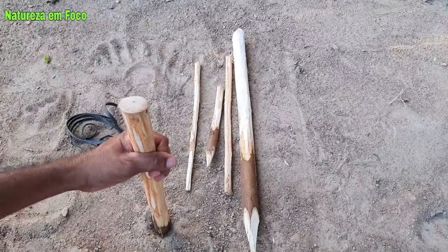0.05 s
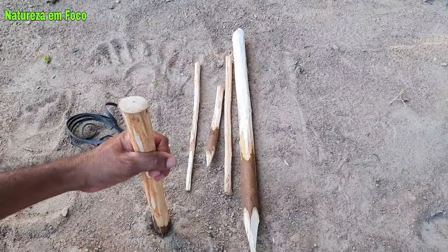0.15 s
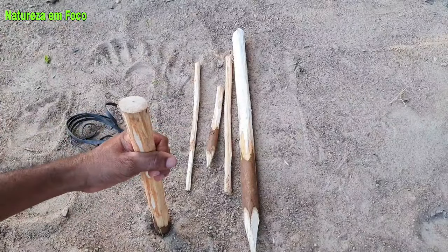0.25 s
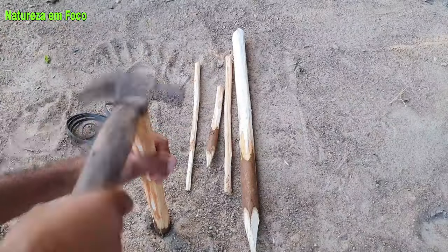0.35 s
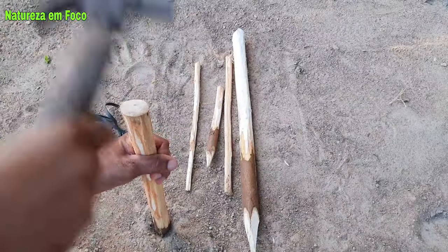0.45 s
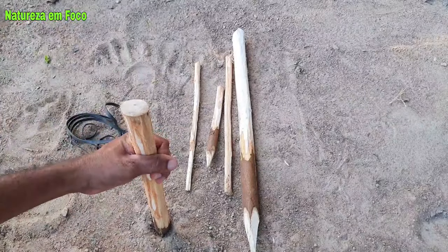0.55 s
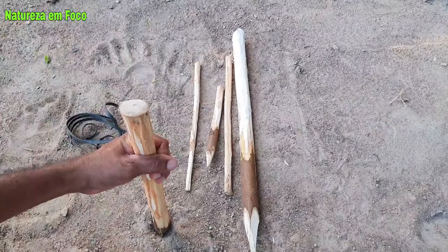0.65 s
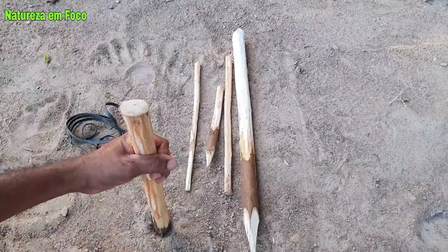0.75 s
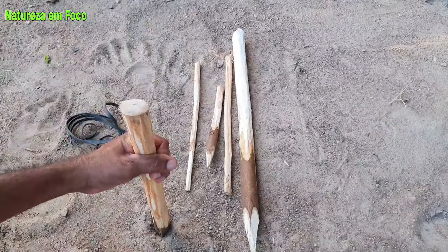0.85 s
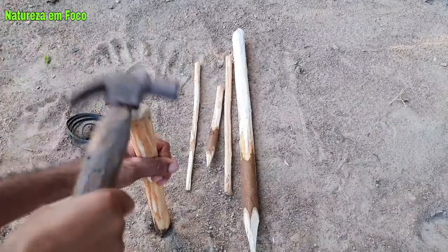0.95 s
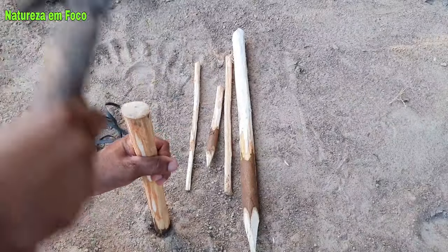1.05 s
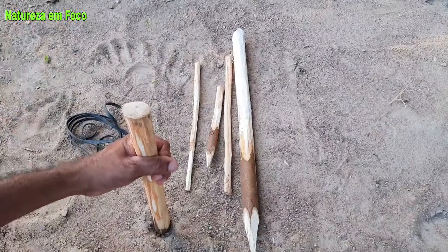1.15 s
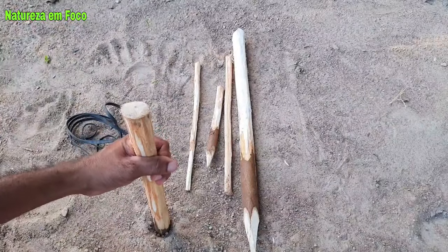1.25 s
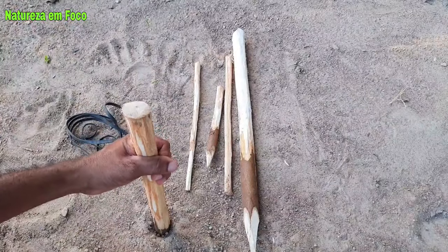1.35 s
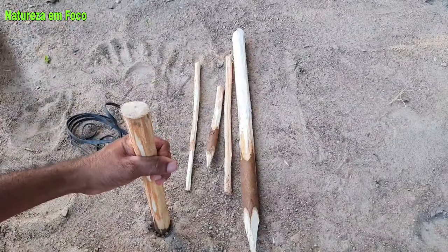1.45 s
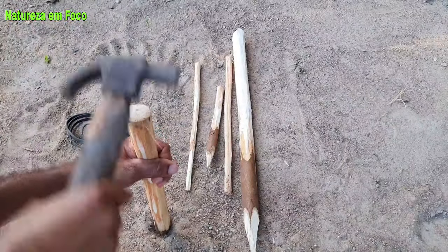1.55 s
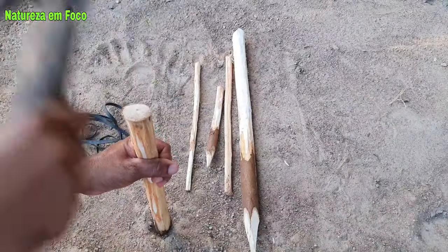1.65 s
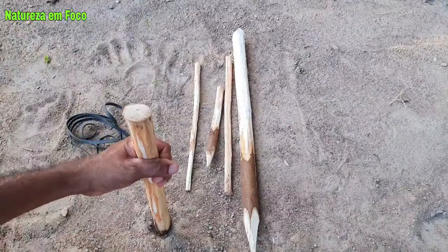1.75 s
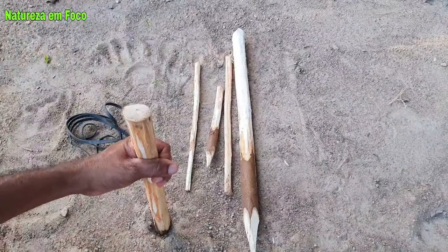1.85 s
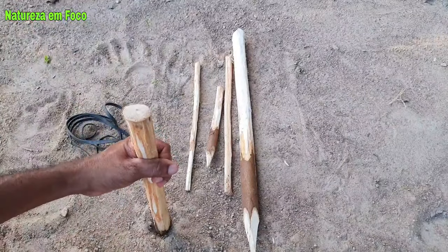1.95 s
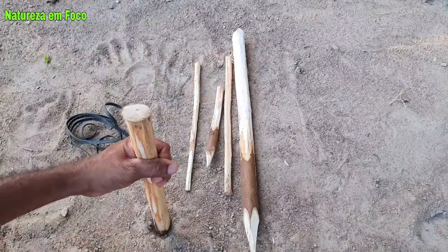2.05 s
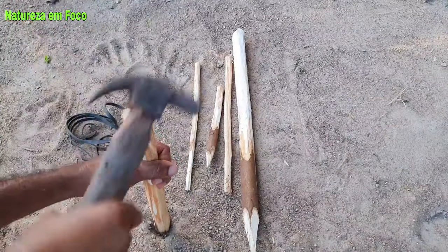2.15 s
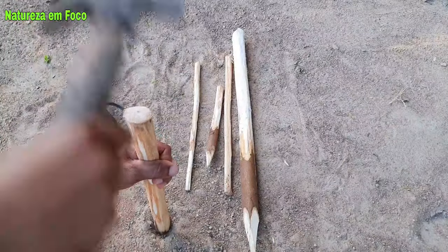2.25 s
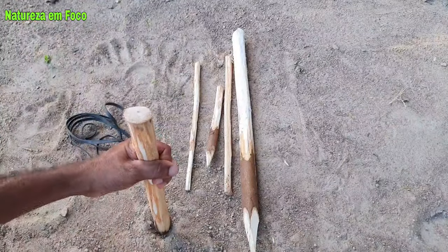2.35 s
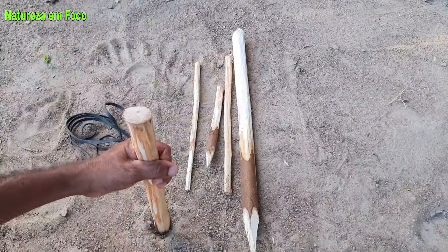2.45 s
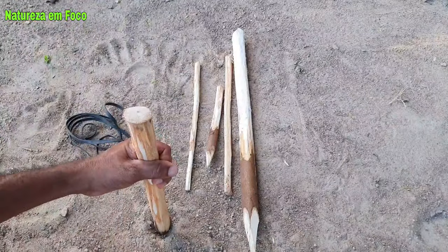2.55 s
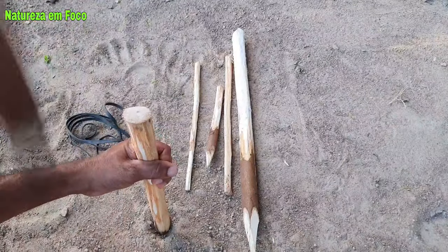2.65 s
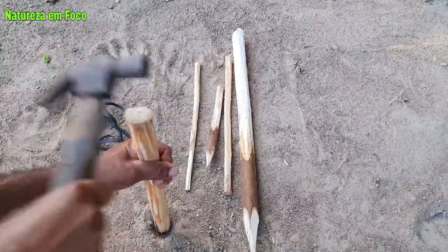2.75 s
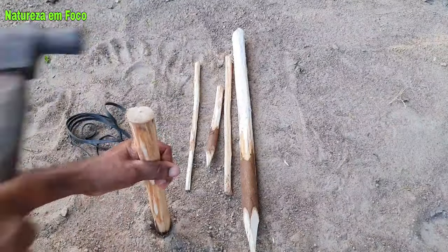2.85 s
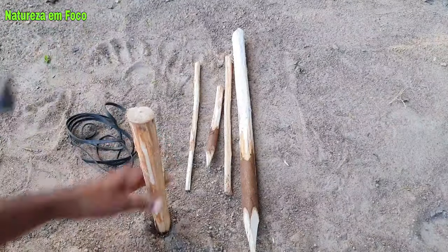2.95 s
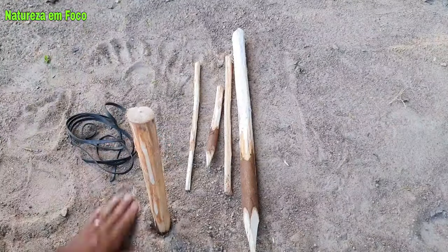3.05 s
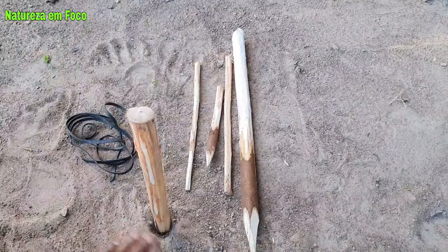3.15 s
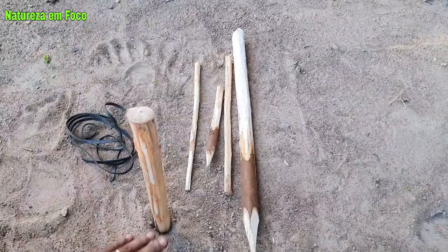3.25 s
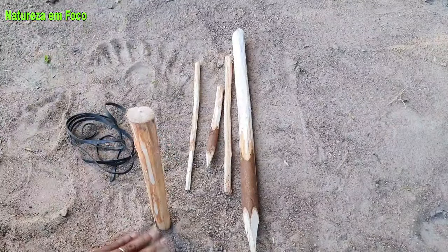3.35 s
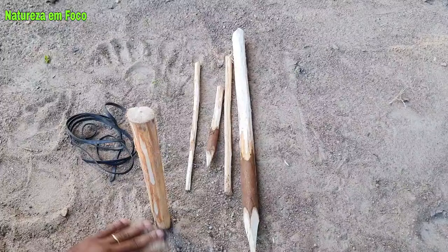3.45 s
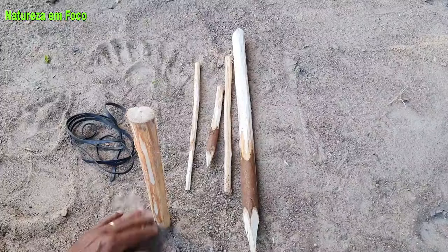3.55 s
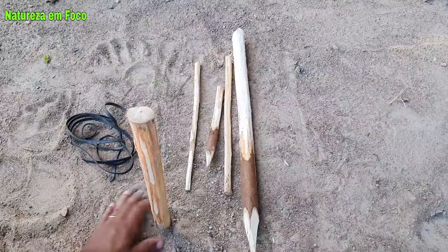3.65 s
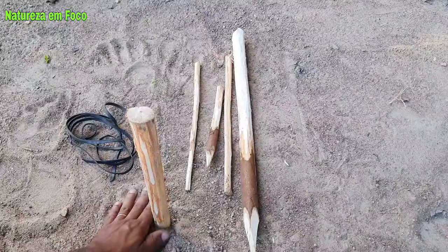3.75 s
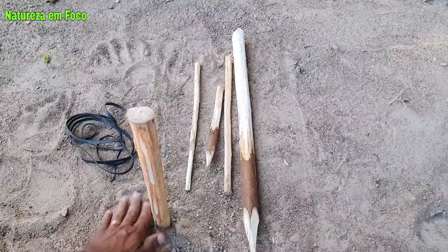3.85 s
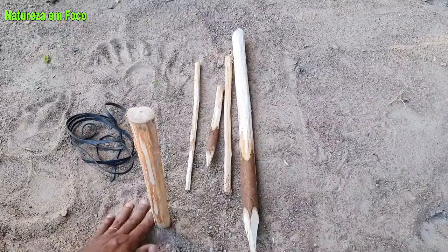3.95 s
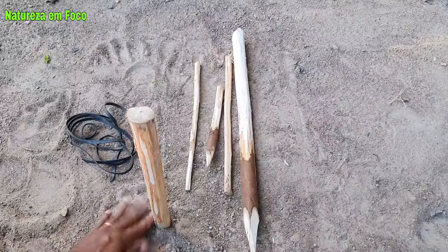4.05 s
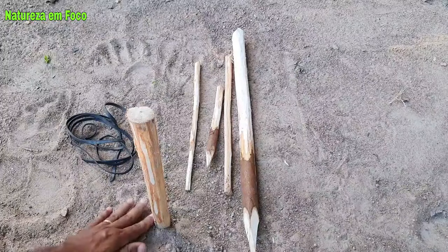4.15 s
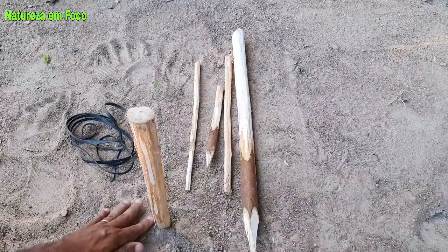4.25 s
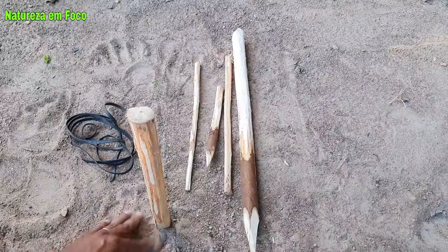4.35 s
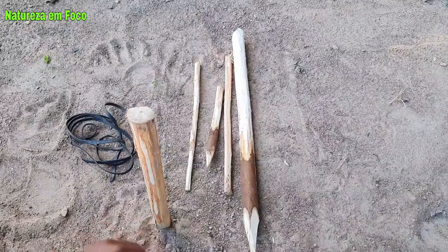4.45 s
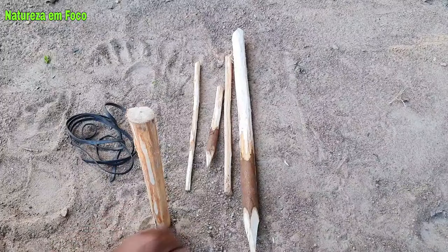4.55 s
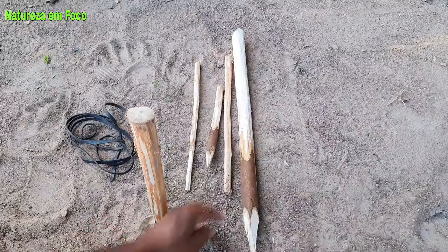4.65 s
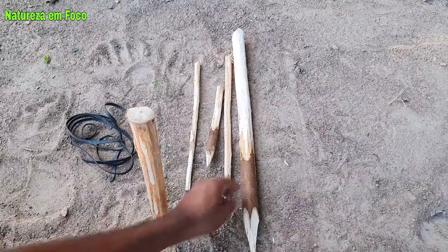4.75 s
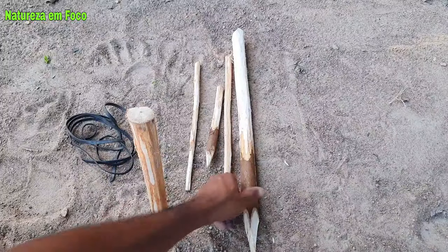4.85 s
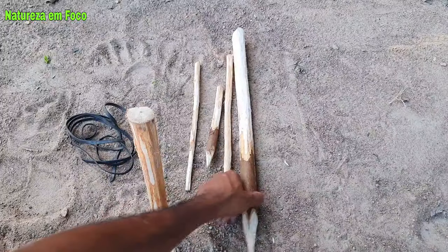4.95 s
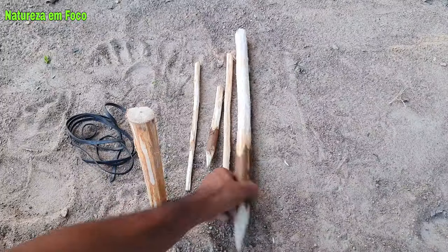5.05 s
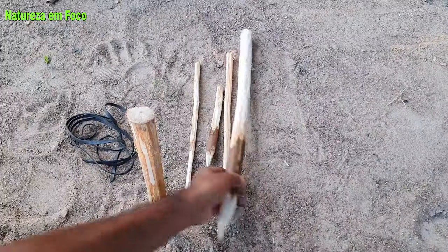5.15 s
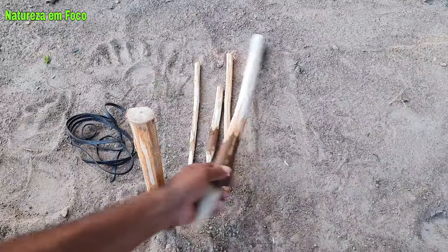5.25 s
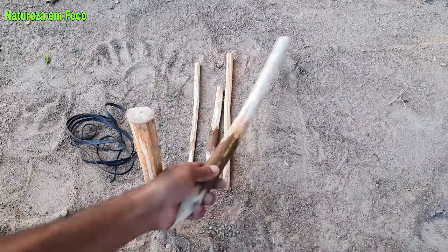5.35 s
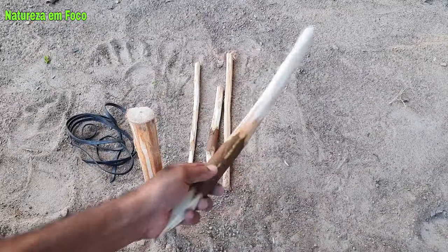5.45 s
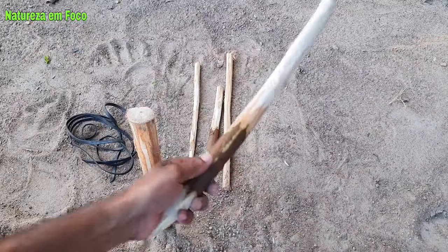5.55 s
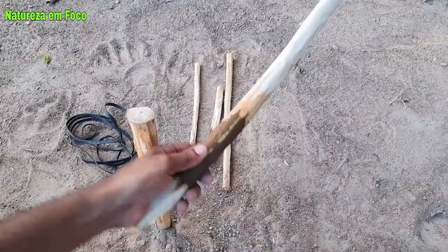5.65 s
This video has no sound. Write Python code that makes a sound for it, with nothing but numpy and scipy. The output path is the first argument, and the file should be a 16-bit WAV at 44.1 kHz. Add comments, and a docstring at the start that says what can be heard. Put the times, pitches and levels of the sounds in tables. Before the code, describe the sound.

Outdoors on sandy ground, a steel hammer drives a hand-held wooden stake. The tail of a blow opens the sound, then loud blows fall at about 0.5, 1.1, 1.65, 2.3 and 2.85 seconds. Each is a short, dry, mid-pitched wooden knock with a crisp crack, a slight low soil thud and barely any steel ring, trailed by a brief diffuse echo. At 3.2 the hammer is laid down with a soft thump and crunch. From 3.5 to 4.8 a hand quietly presses and smooths the sand; from about 4.8 to the end another stake scrapes and lifts, with grains running and small woody ticks, clearest near 5.4. Very quiet behind: high insect shrilling with a regular phrase, distant falling whistles mostly before 2.2, hoarse bird chips near 2 and 4, air rumble, and a far engine hum slowing after 3.3. Close stereo microphones, blows slightly left.

```python
"""A steel hammer drives a hand-held wooden stake into sandy ground with steady blows, outdoors.
Each blow sums damped modes of wood and steel, a noisy crack and a soil thud of falling pitch; noise forms its echoes.
Then the hammer is laid down, a hand smooths the sand and lifts another stake: clumped impulses and shaped noise.
Insects drone in narrow bands of noise, birds call in gliding tones blurred by distance,
and a far engine hums on two harmonics over the low rumble of open air."""
import sys
import numpy as np
from scipy import signal
from scipy.fft import rfft, irfft
from scipy.io import wavfile
from scipy.ndimage import map_coordinates

SR = 44100
rng = np.random.default_rng(int(sys.argv[2]) if len(sys.argv) > 2 else 0)


def put_to_file(sound):
    """Save the sound as 16-bit audio at rate SR, in the file named by the first command-line argument."""
    columns = np.atleast_2d(sound).T  # one column per channel
    safe = np.clip(columns, -1, 1)
    whole_steps = np.round(safe * 32767)
    wavfile.write(sys.argv[1], SR, whole_steps.astype(np.int16))


N = 250929
T = np.arange(N) / SR   # time in s

# All spectra below give relative levels.
# hammer blows: start_s, knock_rel_db, knock_pitch_ratio, crack_rel_db, soil_thud_db, steel_rel_db,
# echo_rel_db, echo_length_ratio
BLOWS = [(-0.09, -1, 1, 3, -13, -40.5, -1.5, .9), (0.5010, -0.5, 0.98, 2, -21, -46, 0.5, 0.88),
         (1.0915, 0, .99, -3, -18.5, -45.5, -4, 0.91), (1.6599, 0.5, .99, 0.5, -18.5, -42.5, -2, 0.96),
         (2.2783, 0, 1.025, 3.5, -16.5, -48, 2, 0.84), (2.862, -.5, 0.97, 0.5, -15, -38.5, -2, 0.73)]
# modes of the stake, damped by hand and soil: frequency_hz, level_rel_db, t60_s
STAKE_MODES = [(464, -32.5, 0.039), (695.4, -25.5, 0.046), (1220, -21.5, 0.021), (1450, -15, 0.011),
               (1610, -27.5, 0.0074), (2298, -18, 0.016), (2580, -20.5, .018), (3530, -23.5, .007),
               (4150, -23, 0.0051)]
KNOCK_HZ, KNOCK_PEAK_S, KNOCK_DB = 941, 0.0015, -3   # main mode; each blow shifts its pitch and level
# modes of the hammer head: frequency_hz, level_rel_db, t60_s
STEEL_MODES = [(2686, -9.5, 0.18), (5310, 2.5, 0.17), (5370, -9, 0.073), (5460, -6, 0.19),
               (7580, -9.5, 0.11)]
# crushing of wood fibres at the contact: frequency_hz, level_db_per_hz
CRACK_SPECTRUM = [(400, -1), (1400, -1.5), (2600, 0.5), (4200, -0.5), (5500, -15), (7000, -15), (9500, -20),
                  (15000, -24)]
# scatter from trees and ground: frequency_hz, level_db_per_hz
SCATTER_SPECTRUM = [(100, 3.5), (300, 1), (450, -7.5), (580, -11.5), (740, -0.5), (1000, 3), (1500, -12),
                    (1900, -7), (2500, -3), (3300, -13.5), (4700, -17.5), (7000, -18), (9000, -21.5),
                    (14000, -24)]
# decay of that scatter, before each blow's length ratio: frequency_hz, t60_s
SCATTER_T60 = [(150, 0.36), (500, 0.37), (1400, 0.32), (3700, 0.55), (10000, 0.43)]

# rumble of open air: frequency_hz, level_db_per_hz
AIR_SPECTRUM = [(25, -24.5), (50, -5.5), (75, 3.5), (120, -3), (190, -8.5), (260, -18), (400, -25.5),
                (650, -30), (950, -27.5), (1300, -32), (2200, -30.5), (4300, -33.5), (9000, -47.5),
                (15000, -40.5)]
# left-right likeness of diffuse sound: frequency_hz, likeness_0_to_1
LIKENESS = [(60, 0.88), (130, 0.8), (290, 0.79), (640, 0.1), (1400, 0.61), (4000, 0.36), (6800, 0.9),
            (9000, .15)]
# the far engine holds its speed, then slows: time_s, mean_firing_hz
ENGINE_SPEED = [(0, 79.24), (1.1, 80.13), (3.25, 79.34), (4.45, 75.07), (5.69, 72.42)]
# hum of the engine as it slows: time_s, fundamental_rel_db, second_harmonic_rel_db
ENGINE_LEVEL = [(3.0, -56, -58), (3.51, -62.5, -60), (3.65, -49, -93), (3.72, -48.5, -64),
                (4.42, -63.5, -51.5), (4.52, -42.5, -48), (4.57, -52, -79), (4.64, -61, -54),
                (4.87, -62, -74), (5.12, -54.5, -52.5), (5.16, -54.5, -65.5), (5.69, -53, -51.5)]
# hum before it slows: fundamental_rel_db, second_harmonic_rel_db
ENGINE_STEADY = (-64, -64.5)

# insect chorus: frequency_hz, level_db_per_hz
CHORUS_SPECTRUM = [(4600, -32), (5200, -9.5), (5600, -6), (6100, -3.5), (6550, -2.5), (6900, -0.5),
                   (7200, -6), (7600, -15), (8500, -29)]
CHORUS_DB = -63
# rising notes of the insect's phrase: delay_s, length_s, start_hz, end_hz
PHRASE_NOTES = [(0, .39, 5420, 5496), (.165, .37, 5040, 5202)]
PHRASE_FIRST_S, PHRASE_PERIOD_S, PHRASE_DB = 0.0042, 0.818, -63.5

# a bird's whistles, sliding down to one low note: start_s, length_s, start_hz, level_db
WHISTLES = [(0.235, .15, 3010, -68.5), (0.629, 0.16, 1978, -65), (1.229, 0.087, 1852, -72),
            (1.459, 0.11, 2230, -69), (1.76, .2, 2336, -63), (2.034, 0.046, 2072, -66.5)]
WHISTLE_END_HZ = 1590
# short, hoarse chips of another bird: start_s, start_hz, level_db
CHIPS = [(1.762, 3560, -73), (1.839, 3450, -70.5), (2.178, 3410, -70), (3.508, 4330, -70.5),
         (3.96, 3280, -70.5), (4.06, 3800, -67), (4.079, 2660, -71), (4.12, 4450, -71)]
CHIP_S, CHIP_FALL = 0.07, 0.92   # length; end pitch over start pitch
# far, level notes: start_s, length_s, pitch_hz, level_db
HELD_NOTES = [(2.075, .66, 1683, -73), (4.719, 0.143, 982, -72)]

# sand under the hammer head: frequency_hz, level_db_per_hz
CRUNCH_SPECTRUM = [(800, -10), (1300, -10), (2000, -5.5), (2800, -9), (3500, -22), (6000, -21), (9000, -31)]
# sand pressed softly: frequency_hz, level_db_per_hz
PRESS_SPECTRUM = [(150, -9), (280, 7), (370, 10), (550, -18), (900, -29), (1500, -61)]
# sand scraped: frequency_hz, level_db_per_hz
SCRAPE_SPECTRUM = [(700, -0.5), (1400, -10), (2300, 1), (4000, -2), (6000, 1), (9000, -33)]
# loose grains running: frequency_hz, level_db_per_hz
GRAINS_SPECTRUM = [(4000, -27), (8000, -1), (11000, -8.5), (15000, -5.5)]
# strokes of the hand, then of the lifted stake, over the sand:
# middle_s, length_s, pressing_rel_db, scraping_rel_db
STROKES = [(3.749, 0.52, -78, -69.5), (4.001, 0.17, -65, -77), (4.108, .14, -66, -66.5),
           (4.503, 0.76, -67, -66.5), (4.91, 0.17, -61.5, -63), (5.151, 0.43, -71.5, -61),
           (5.382, 0.17, -73, -62.5), (5.599, 0.55, -72.5, -66)]
GRAINS_FOLLOW = 1   # share of the scraping's swing in dB that the loose grains follow
GRAINS_DB, GRAINS_AT_SCRAPE_DB = -70.5, -64.5   # grain level at this scraping strength

# modes of the loose stake: frequency_hz, level_rel_db, t60_s
LOOSE_STAKE_MODES = [(810, -5, 0.056), (1540, -7, 0.028), (2175, -8.5, 0.055), (2800, -7, 0.066),
                     (3380, -3.5, 0.037), (3880, -1.5, 0.041), (4270, -4, 0.057), (5070, 4.5, 0.021)]
# grit catching the loose stake: start_s, strength_rel_db
TICKS = [(5.143, -47), (5.203, -50.5), (5.33, -52), (5.36, -51.5), (5.382, -44), (5.393, -51), (5.53, -58),
         (5.67, -61.5)]
# a grain cracking under the tip: frequency_hz, level_db_per_hz
SNAP_SPECTRUM = [(800, -15), (2500, -12), (5000, 9), (9000, -10), (15000, -16)]


def from_db(db):
    """Amplitude ratio: every 20 dB multiplies the amplitude by ten."""
    return 10 ** (np.asarray(db) / 20)


def rms_one(x):
    """Normalization of power: scale to unit rms."""
    return x / np.sqrt(np.mean(x ** 2) + 1e-20)


def in_time(rows):
    """Linear interpolation: each column of a time table at every sample."""
    times, *columns = np.transpose(rows)
    return [np.interp(T, times, column) for column in columns]


def at_hz(points, hz):
    """Logarithmic frequency scale: interpolate a table along it."""
    table_hz, value = np.transpose(points)
    return np.interp(np.log(np.maximum(hz, 1)), np.log(table_hz), value)


def add(track, s, sound):
    """Superposition: add a sound at time s, trimmed to the track."""
    i = round(s * SR)
    sound, i = sound[max(-i, 0):], max(i, 0)
    track[i:i + len(sound)] += sound[:N - i]


def drift(rate_hz):
    """Low-passed noise: a slow random fluctuation of unit rms."""
    low_pass = 1 / (1 + (np.fft.rfftfreq(N, 1 / SR) / rate_hz) ** 4)
    return rms_one(irfft(rfft(rng.standard_normal(N)) * low_pass, N))


def colour(x, spectrum):
    """Minimum-phase filtering: a causal response of the given spectrum, with unit energy."""
    size = 4096
    cepstrum = irfft(np.log(from_db(at_hz(spectrum, np.fft.rfftfreq(size, 1 / SR)))))
    index = np.arange(size)
    # folding the cepstrum onto positive times makes the response causal
    causal = 2 * cepstrum * (index > 0) * (index < size // 2)
    response = irfft(np.exp(rfft(causal)))
    response /= np.linalg.norm(response)
    response = response.reshape((1,) * (x.ndim - 1) + (-1,))
    return signal.fftconvolve(x, response, axes=-1)[..., :x.shape[-1]]


def diffuse(spectrum):
    """Diffuse field: noise whose likeness between the ears varies with frequency; unit rms."""
    mid, side = rfft(rng.standard_normal((2, N)))
    hz = np.fft.rfftfreq(N, 1 / SR)
    alike = np.clip(at_hz(LIKENESS, hz), 0, 1)
    ears = np.sqrt(1 + alike) * mid + np.sqrt(1 - alike) * side * [[1], [-1]]
    return rms_one(irfft(from_db(at_hz(spectrum, hz)) * ears, N))


def ring(t, hz, t60):
    """Damped oscillation: a struck mode falls by 60 dB in t60 seconds."""
    return np.sin(2 * np.pi * hz * t) * from_db(-60 * t / t60)


def swell(t, peak_s):
    """Transient envelope: rises to 1 at peak_s, then dies away."""
    return t / peak_s * np.exp(1 - t / peak_s)


def note(length, start_hz, end_hz, blur_hz, clear):
    """Multipath propagation: many paths through leaves blur a gliding tone into a narrow band."""
    u = np.linspace(0, 1, int(length * SR))
    hz = end_hz + (start_hz - end_hz) * (1 - u) ** 1.2
    phase = 2 * np.pi * np.cumsum(hz) / SR
    low_pass = signal.butter(2, blur_hz, fs=SR, output="sos")
    paths = signal.sosfilt(low_pass, rng.standard_normal((2, len(u))))
    in_phase = (clear + rms_one(paths[0])) * np.sin(phase)   # clear: share of the unblurred tone
    quadrature = rms_one(paths[1]) * np.cos(phase)
    return rms_one(in_phase + quadrature) * signal.windows.tukey(len(u), 0.5)


def grit(spectrum, per_s, clump_db):
    """Stochastic friction: sand grains slip at random, in clumps, independently at each ear."""
    slips = (rng.random((2, N)) < per_s / SR) * rng.standard_normal((2, N))
    return rms_one(colour(slips * from_db(clump_db * drift(29)), spectrum))


def from_the_left(x, lag_s, pan_db):
    """Interaural difference: the right ear hears the stake later and softer."""
    later = map_coordinates(x, [np.arange(len(x)) - lag_s * SR], order=3)
    return np.array([x * from_db(pan_db), later * from_db(-pan_db)])


def soil_thud(t, start_hz=230, end_hz=53, glide_s=0.0096, peak_s=0.0052,
              bend_hz=293, bend_db=5.0, bend_t60=0.024, bend_delay_s=0.00083):
    """Yielding load: the thud drops in pitch as the stake comes to rest; its lowest bending mode joins in."""
    hz = end_hz + (start_hz - end_hz) * np.exp(-t / glide_s)
    thud = np.sin(2 * np.pi * np.cumsum(hz) / SR) * swell(t, peak_s)
    bend = from_db(bend_db) * ring(np.maximum(t - bend_delay_s, 0), bend_hz, bend_t60)
    return thud + bend


def hammer(crack_db=-17, crack_s=0.0013, thud_delay_s=0.0038, contact_s=0.00025):
    """Impact excitation: each blow sets off the stake's modes, a crack, the soil and the steel head."""
    knock, wood, top, soil = np.zeros((4, N))
    t = T[:SR // 2]
    for s, knock_db, pitch, fibres_db, thud_db, steel_db, *_ in BLOWS:
        # the main mode dies within a few cycles
        main_mode = np.sin(2 * np.pi * KNOCK_HZ * pitch * t) * swell(t, KNOCK_PEAK_S) ** 2
        add(knock, s, from_db(KNOCK_DB + knock_db) * main_mode)
        modes = sum(from_db(db + knock_db + rng.standard_normal()) * ring(t, hz, t60)
                    for hz, db, t60 in STAKE_MODES)
        # the others build up during contact and swing against the main mode
        add(wood, s, -modes * (1 - np.exp(-t / contact_s)))
        crack = colour(rng.standard_normal(len(t)) * swell(t, crack_s), CRACK_SPECTRUM)
        add(top, s, from_db(crack_db + fibres_db) * crack)
        add(top, s, sum(from_db(steel_db + db) * ring(t, hz, t60) for hz, db, t60 in STEEL_MODES))
        add(soil, s + thud_delay_s, from_db(thud_db) * soil_thud(t))
    # each part radiates from another place on the stake, so each has its own lag between the ears
    out = from_the_left(knock, lag_s=0.00017, pan_db=1.27)
    out += from_the_left(wood, lag_s=0.0001, pan_db=1.25)
    out += from_the_left(top, lag_s=0.00015, pan_db=2.85)
    return out + from_the_left(soil, lag_s=0.00012, pan_db=0.97)


def surroundings(level_db=-37, build_s=0.0077, near_db=-2, near_s=0.023, uneven_db=1.0):
    """Multiple scattering: countless weak echoes of each blow build up, then each band decays at its own rate."""
    t, out = T[:SR * 3 // 4], np.zeros((2, N))
    edges = np.geomspace(60, 17000, 21)
    hz = np.sqrt(edges[1:] * edges[:-1])
    gains = from_db(at_hz(SCATTER_SPECTRUM, hz)) * np.sqrt(np.diff(edges))
    gains /= np.linalg.norm(gains)
    for low, high, gain, t60 in zip(edges, edges[1:], gains, at_hz(SCATTER_T60, hz)):
        band_pass = signal.butter(2, [low, high], "band", fs=SR, output="sos")
        for s, *_, echo_db, length in BLOWS:
            decay = from_db(level_db + echo_db - 60 * t / (t60 * length))
            envelope = (1 - np.exp(-(t / build_s) ** 2)) * decay
            # the nearest things answer in a cluster
            envelope *= 1 + from_db(near_db) * swell(t, near_s) ** 10
            for ear in out:
                # random level steps, 128 samples long
                steps = np.repeat(rng.standard_normal(len(t) // 128 + 1), 128)[:len(t)]
                echoes = rng.standard_normal(len(t)) * from_db(uneven_db * steps)
                add(ear, s, gain * envelope * rms_one(signal.sosfilt(band_pass, echoes)))
    return out


def background(air_db=-57, engine_db=-2, waver_db=2.5, off_beat_db=-72):
    """Harmonic series: a far engine slows over outdoor rumble; uneven firing adds a line at 2.5 times its rate."""
    hz, = in_time(ENGINE_SPEED)
    slows = T >= ENGINE_LEVEL[0][0]
    first_db, second_db = np.where(slows, in_time(ENGINE_LEVEL), np.c_[list(ENGINE_STEADY)])
    phase = 2 * np.pi * np.cumsum(hz * (1 + 0.008 * drift(9.4))) / SR
    hum = from_db(first_db) * np.sin(phase) + from_db(second_db) * np.sin(2 * phase)
    hum += from_db(off_beat_db) * np.sin(2.5 * phase)
    engine = from_db(engine_db + waver_db * drift(18)) * np.sqrt(2) * hum
    return from_db(air_db) * diffuse(AIR_SPECTRUM) + engine


def far_whine(start_hz=1660, end_hz=1520, db=-78, waver_db=3):
    """Narrow-band noise: a faint, far whine wavers in level and sinks slowly."""
    # the scene hears the middle of a longer glide
    whine = np.array([note(1.3 * N / SR, start_hz, end_hz, blur_hz=55, clear=0)[N // 4:N // 4 + N]
                      for ear in range(2)])
    return from_db(db + waver_db * drift(3.7)) * whine


def insects(whine_hz=6850, whine_db=-9, blur_hz=105):
    """Incoherent summation: a chorus with one shrill voice, and a regular phrase of two rising notes."""
    phase = 2 * np.pi * whine_hz * T
    whine = rms_one(drift(28) * np.sin(phase) + drift(28) * np.cos(phase))
    out = from_db(CHORUS_DB) * (diffuse(CHORUS_SPECTRUM) + from_db(whine_db) * whine)
    for ear in out:
        for s in PHRASE_FIRST_S + PHRASE_PERIOD_S * np.arange(7):
            for delay, length, start_hz, end_hz in PHRASE_NOTES:
                voice = note(length, start_hz, end_hz, blur_hz, clear=0.34)
                add(ear, s + delay, from_db(PHRASE_DB) * voice)
    return out


def birds(echo_db=-6, echo_t60=0.35):
    """Reverberation: distant whistles, chips and level notes are trailed by their echo from the trees."""
    out, t = np.zeros((2, N)), T[:SR // 3]
    for ear in out:
        for s, length, start_hz, db in WHISTLES:
            add(ear, s, from_db(db) * note(length, start_hz, WHISTLE_END_HZ, blur_hz=89.45, clear=1.0))
        for s, hz, db in CHIPS:
            add(ear, s, from_db(db) * note(CHIP_S, hz, hz * CHIP_FALL, blur_hz=128.5, clear=0.8))
        for s, length, hz, db in HELD_NOTES:
            add(ear, s, from_db(db) * note(length, hz, hz, blur_hz=25, clear=1.8))
        trees = rng.standard_normal(len(t)) * from_db(-60 * t / echo_t60)
        trees /= np.linalg.norm(trees)
        ear += from_db(echo_db) * signal.fftconvolve(ear, trees)[:N]
    return out


def hammer_put_down(s=3.172, thump_db=-52, thump_s=0.032, crunch_db=-56, crunch_s=0.049):
    """Inelastic impact: the head meets the sand with a soft thump, and grains crunch under it."""
    t = np.maximum(T - s, 0)
    thump = from_db(thump_db) * diffuse(PRESS_SPECTRUM) * swell(t, thump_s) ** 2
    crunch = grit(CRUNCH_SPECTRUM, per_s=3800, clump_db=3.0) * swell(t, crunch_s) ** 2
    return thump + from_db(crunch_db) * crunch


def strokes(shape=0.78):
    """Amplitude envelope: each stroke swells and eases in one arch, giving pressing and scraping strength."""
    press, scrape = np.zeros((2, N))
    for s, length, press_db, scrape_db in STROKES:
        arch = np.maximum(1 - (2 * (T - s) / length) ** 2, 0) ** shape
        press += from_db(press_db) * arch
        scrape += from_db(scrape_db) * arch
    return press, scrape


def handling(press_db=-1, scrape_db=-2):
    """Granular friction: a hand smooths the sand, then drags a stake; scraping sets loose grains running."""
    press, scrape = strokes()
    grains = from_db(GRAINS_DB) * (scrape / from_db(GRAINS_AT_SCRAPE_DB)) ** GRAINS_FOLLOW
    sand = from_db(press_db) * press * diffuse(PRESS_SPECTRUM)
    sand += from_db(scrape_db) * scrape * grit(SCRAPE_SPECTRUM, per_s=1500, clump_db=0.5)
    return sand + grains * grit(GRAINS_SPECTRUM, per_s=4500, clump_db=2.0)


def loose_stake(grab_s=5.05, drag_db=-10, per_s=300, tick_db=-8, snap_db=2):
    """Modal response: grit snaps under the lifted stake's tip and rings its free bending modes."""
    scrape, t = strokes()[1], T[:SR // 8]
    slips = (rng.random(N) < per_s / SR) * rng.standard_normal(N)
    slips *= scrape * from_db(drag_db) * (T > grab_s)
    catches = np.zeros(N)
    for s, db in TICKS:
        add(catches, s, from_db([db]))   # a single-sample impulse
    out = np.zeros((2, N))
    for ear in out:
        body = sum(from_db(db) * rng.choice([-1, 1]) * ring(t, hz, t60)
                   for hz, db, t60 in LOOSE_STAKE_MODES)
        ear += signal.fftconvolve(slips + from_db(tick_db) * catches, body)[:N]
    return out + from_db(snap_db) * colour(catches, SNAP_SPECTRUM)


def scene():
    """Superposition: the blows and their echoes, the handling and the open air."""
    work = hammer() + surroundings() + hammer_put_down() + handling() + loose_stake()
    return work + background() + far_whine() + insects() + birds()


def record(dry, low_cut_hz=36, high_cut_hz=15700):
    """Band limiting and saturation: deep bass is lost, high peaks are rounded and the top is cut."""
    dry = signal.sosfilt(signal.butter(2, low_cut_hz, "high", fs=SR, output="sos"), dry)
    rounded = 0.97 * dry / (1 + dry ** 8) ** (1 / 8)
    return signal.sosfilt(signal.ellip(10, 0.1, 70, high_cut_hz, fs=SR, output="sos"), rounded)


dry = scene()
out = record(dry)
put_to_file(out)
```